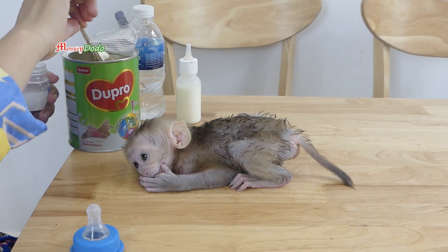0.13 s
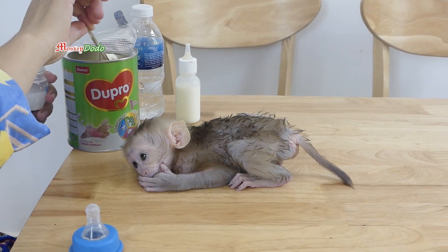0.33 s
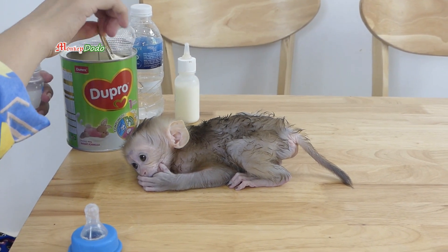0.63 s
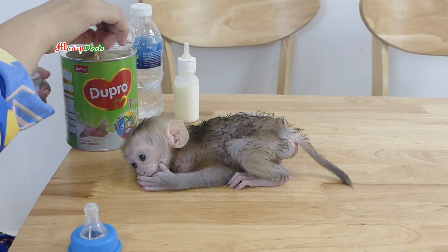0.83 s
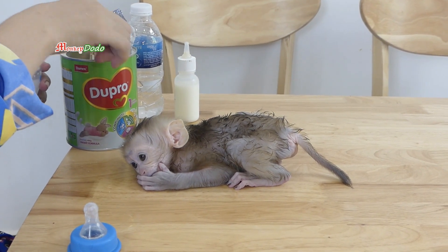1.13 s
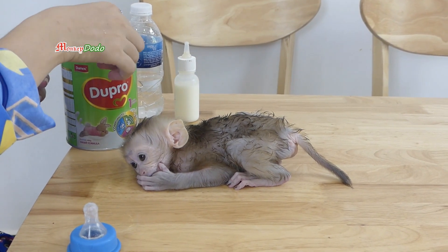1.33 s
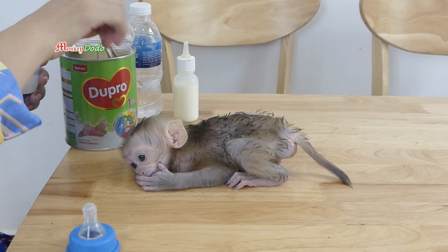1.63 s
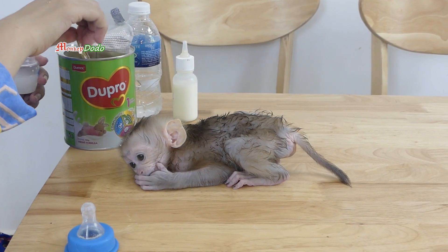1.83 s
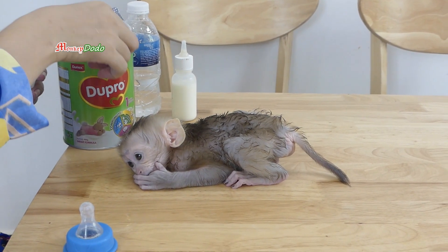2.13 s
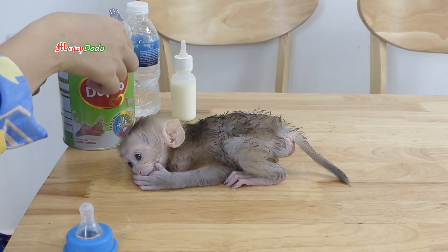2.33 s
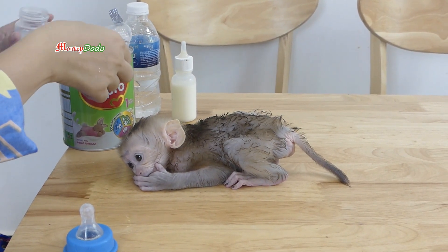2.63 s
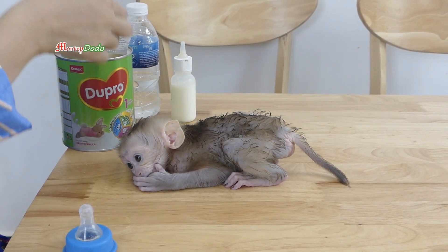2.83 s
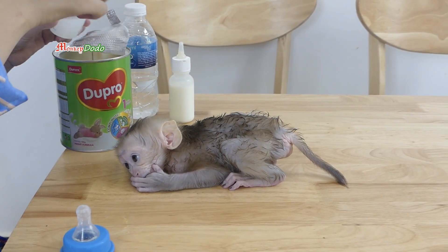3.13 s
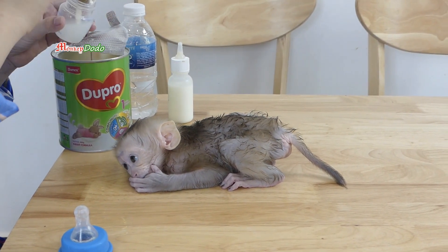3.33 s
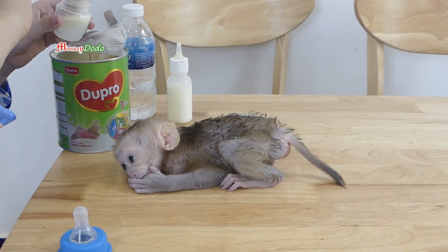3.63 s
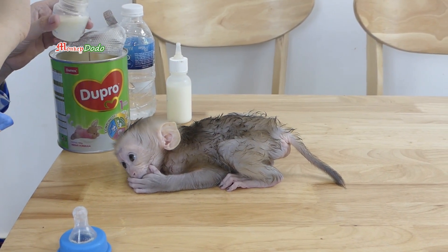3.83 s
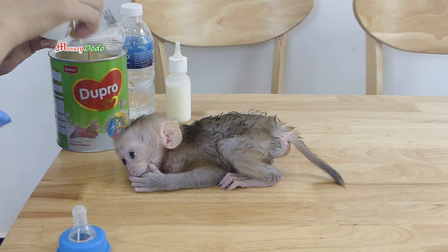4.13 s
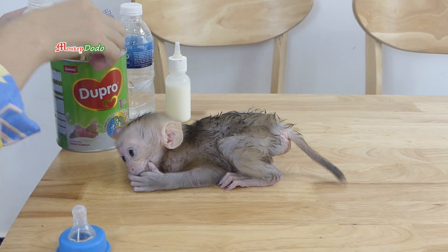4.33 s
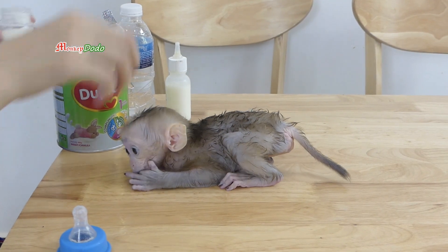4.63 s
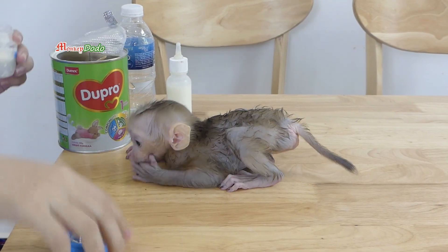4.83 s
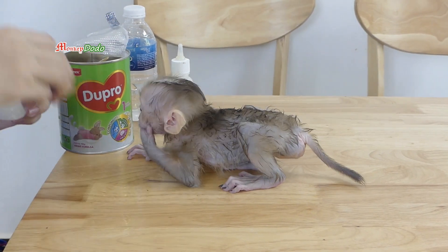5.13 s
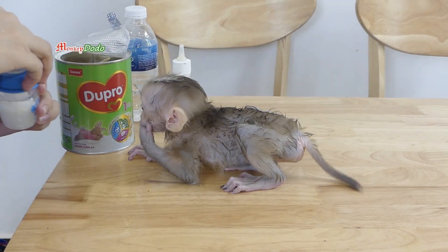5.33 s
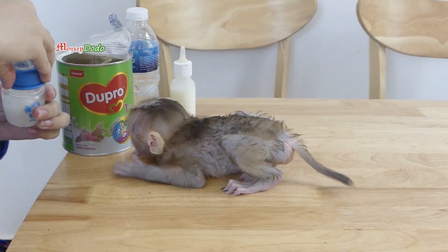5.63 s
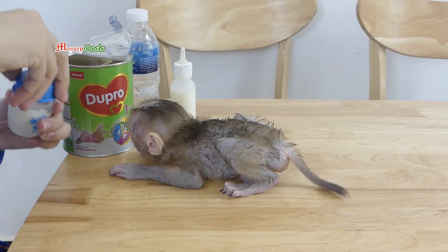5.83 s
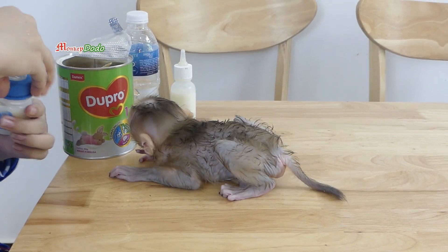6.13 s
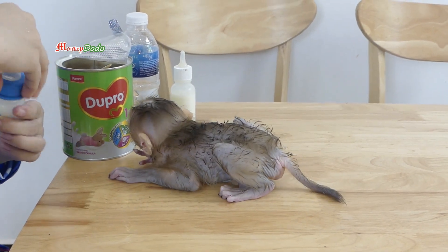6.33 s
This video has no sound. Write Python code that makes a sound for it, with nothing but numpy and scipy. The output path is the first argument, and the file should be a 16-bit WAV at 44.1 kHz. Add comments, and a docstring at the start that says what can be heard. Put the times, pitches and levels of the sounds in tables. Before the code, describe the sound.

In a bare ringing room, a scoop taps a powder tin, a small monkey coos twice and screams, and a bottle cap snaps shut.

```python
"""Mains hum and room air lie beneath everything; a scoop taps and scrapes in a milk-powder tin.
A baby monkey on a wooden table cries three times in a bare, ringing room: two coos and a torn scream.
Foil crackles, a plastic bottle cap clicks and snaps shut, and the table thuds. Struck bodies are sums of
decaying modes, contacts are noise bursts, the voice is a stack of overtones coloured by the throat,
and the echoes are noise that decays band by band."""
import sys
import numpy as np
from scipy import signal
from scipy.fft import rfft, irfft, next_fast_len
from scipy.io import wavfile
from scipy.ndimage import uniform_filter1d

SR = 44100
rng = np.random.default_rng(int(sys.argv[2]) if len(sys.argv) > 2 else 0)


def int16_out(signal):
    """Quantize to a 16-bit WAV file."""
    q = np.round(np.clip(np.atleast_2d(signal).T, -1, 1) * 32767)
    wavfile.write(sys.argv[1], SR, q.astype(np.int16))


N = 285327
T = np.arange(N) / SR

# Spectrum of the room air. Each row: frequency in Hz, relative level in dB.
AIR_SPECTRUM = [(15, -64.5), (25, -25), (59, -12), (166, -7), (301, -6), (405, -11.5), (489, -2.5),
                (677, -14), (911, -12.5), (1560, -24), (5880, -25.5), (14800, -28), (16000, -44)]
# Stereo spread of the air. Each row: frequency in Hz, side minus mid in dB.
AIR_SIDE_SPECTRUM = [(60, -2), (110, 8), (200, 6.5), (380, 3), (700, 1.5), (1290, 4.5), (2380, 1),
                     (4400, -5), (8120, -6.5), (15000, -3)]
# Overtones of the machine. Each row: multiple of the mains frequency, mean level in dB.
HUM_OVERTONES = [(2, -77), (3, -68), (4, -72), (5, -69), (6, -74)]
AIR_DB, MAINS_HZ = -63.5, 60.1  # overall level of the air's mid signal; mains frequency

# Reverberation. Each row: frequency in Hz, t60 in s, side minus mid in dB.
ROOM_DECAY = [(150, 0.73, -6), (500, 0.86, -7.5), (1170, 0.79, -5.5), (3040, 0.9, -10), (7900, 0.82, -26.5),
              (14100, 0.61, 4.5)]
WET_DB, FIRST_WALL_S = 1.5, 0.0066
# The mouth beams its treble forward. Each row: frequency in Hz, level sent to the walls in dB.
VOICE_TO_WALLS = [(1000, -1.5), (4000, -5), (10000, -5)]
THUD_TO_WALLS_DB, TICK_TO_WALLS_DB = -4.5, -6.5

# Thuds on the table. Each row: start in s, peak in dB, frequency in Hz favoured by where the top is struck.
TABLE_THUDS = [(4.859, -45.5, 120), (4.921, -49, 198), (5.301, -46, 487), (5.631, -47, 407),
               (5.774, -35, 241.5), (5.91, -42.5, 262)]
# Modes of the table top. Each row: frequency in Hz, level in dB before the striking place weights it, t60 in s.
TABLE_MODES = [(114.2, -7.5, 1.4), (187.4, -23, 0.045), (239.7, 9.5, 0.14), (337, 9.5, 0.074),
               (422.4, 13.5, 0.11), (589, 9, 0.094)]
# Bright ticks: foil and thread, and at 0.171 s a grain of powder under the scoop. Each row: start in s, peak in
# dB, band centre in Hz.
BRIGHT_TICKS = [(0.171, -49.5, 9500), (1.455, -47.5, 10200), (2.469, -49, 7300), (3.071, -55, 4140),
                (4.962, -32, 3920), (5.309, -38.5, 8150), (6.088, -45, 11300), (6.095, -61, 12700),
                (6.107, -53, 9600), (6.315, -57, 12000)]

# Scoop against the tin. Each row: start in s, peak of the ring in dB, clatter relative to the ring in dB,
# clatter centre in Hz, fizz relative to the clatter in dB.
SCOOP_TAPS = [(.158, -60.5, 8.5, 4500, 2), (.216, -64, 6, 3580, 6), (.478, -42, -8, 2700, 1),
              (.53, -50, -12, 2720, -4), (.555, -61, -12, 2000, -10), (1.443, -50, 3.5, 1630, -2),
              (1.573, -50.5, -1.5, 4900, -2.5), (3.758, -43, -9, 3460, 2.5), (4.215, -39.5, -4, 2900, -2),
              (4.478, -47.5, 8, 2960, -11), (5.3, -35.5, -0.5, 3460, -10)]
# Modes of the tin, damped by the powder. Each row: frequency in Hz, level in dB, t60 in s.
TIN_MODES = [(810, 0, .08), (1070, -2, .08), (1450, -1, .09), (1540, -3, .08), (1300, -7, .06),
             (1750, -6, .06), (1930, -4, .08), (2060, -5, .08), (2450, -5, .06), (2720, -3, .06),
             (3150, -6, .06), (3600, -10, .05), (4720, -11, .04), (5600, -13, .03)]
# Strokes of the scoop. Each row: loudest moment in s, level in dB, rise in dB per s, fall in dB per s.
SCOOP_STROKES = [(0.257, -51.5, 510, 1800), (0.375, -57.5, 1360, 152)]
GRIT_DB = -11.5  # hiss of the powder relative to the ringing tin
# Plastic cap on the bottle. Each row: start in s, peak of the ring in dB, clatter relative to the ring in dB,
# clatter centre in Hz, fizz relative to the clatter in dB.
CAP_SNAPS = [(5.57, -63, 4, 4210, -20), (5.6205, -12.5, -9, 3140, -12.5), (6.2165, -54, 10.5, 720, -17),
             (6.246, -46.5, -1.5, 4100, -11)]
# Modes of the cap. Each row: frequency in Hz, level in dB, t60 in s.
CAP_MODES = [(330, -28, .05), (600, -28, .05), (950, -26, .04), (1180, -20, .04), (2300, -13, .015),
             (2740, -4, .022), (2920, -4, .02), (3020, 0, .024), (3300, -6, .018), (3740, -12, .015),
             (6000, -18, .01), (7000, -18, .01)]

# Each coo is two pushes of breath. Each row: start, first crest, slack, second crest, fading and end in s,
# level in dB, brightness in dB per overtone octave, pitch in Hz, quavers per s, quaver slowing per s squared,
# moment of settling in s, settled pitch in Hz.
COO_CALLS = [(3.332, 3.503, 3.535, 3.57, 3.68, 3.663, -30.5, -0.43, 1013, 14.5, 15.88, 3.592, 952.4),
             (4.121, 4.171, 4.21, 4.295, 4.325, 4.35, -30.5, 2, 995.9, 12.37, 0.079, 4.35, 990)]
# Effort of a coo at start, first crest, slack, second crest, fading and end.
# Each row: level in dB, brightness in dB per overtone octave, both added to the call's own.
COO_EFFORT = [(-8, -4), (-0.5, 2.5), (-12.5, 5.5), (-0.7, 2.5), (-6.5, 2.5), (-14.5, -10.5)]
QUAVER_SHARE, QUAVER_GROWS_S, SETTLE_S = 0.0213, .07, 0.0282
# The scream rises, breaks and falls. Each row: time in s, pitch in Hz, level in dB.
SCREAM_COURSE = [(4.933, 1351, -35), (4.959, 1432, -31.5), (4.98, 1338, -24), (5.04, 1338, -29.5),
                 (5.046, 1220, -30), (5.129, 1065, -31), (5.161, 1140, -41), (5.198, 1100, -35.5),
                 (5.222, 951, -31), (5.24, 734, -36)]
TEAR_S, MEND_FROM_S, MENDED_S = 5.043, 5.11, 5.165  # the folds tear at once and mend slowly
THREE_TO_FOUR_S = 5.088  # the uneven pattern first repeats every three cycles, then every four
TORN_UNEVEN, MENDED_UNEVEN = .75, 0.12
TORN_BREATH, CLEAR_BREATH = 2.1, 0.18
# brightness terms in dB per overtone octave, and the time the mouth takes to close
CLEAR_BRIGHT_DB, MENDED_BRIGHT_DB, CLOSING_DB, CLOSING_S = 0.65, 3, -41, .018
# Throat and mouth nearly shut. Each row: frequency in Hz, level in dB.
SHUT_THROAT = [(300, -20), (1000, 2), (2000, -19), (3000, -31.5), (4000, -18), (5000, -36.5), (6500, -45),
               (8500, -36.5), (11000, -52), (14000, -69)]
# Throat and mouth wide open. Each row: frequency in Hz, level in dB.
OPEN_THROAT = [(300, -23), (700, -8.5), (1050, -3), (1600, 0.5), (1900, -25.5), (2300, -16.5), (2900, -16),
               (3500, -10.5), (3950, -21.5), (4600, -15.5), (5000, -39), (5700, -28), (7000, -37),
               (10500, -39.5), (13000, -81)]

BASS_CUT_HZ, TOP_HZ = 114, 15700


def undb(db):
    """A level in decibels is the logarithm of an amplitude ratio; this inverts it."""
    return 10 ** (np.asarray(db) / 20)


def unit(x):
    """Normalization divides a signal by its root mean square."""
    return x / np.sqrt(np.mean(x ** 2))


def on_log(hz, table, column=1):
    """Interpolation on a log-frequency axis reads a spectrum table by musical interval."""
    table = np.array(table)
    return np.interp(np.log(np.maximum(hz, 1)), np.log(table[:, 0]), table[:, int(column)])


def colour(x, table):
    """Linear filtering multiplies the spectrum by a gain given as (Hz, dB) points."""
    size = next_fast_len(len(x))
    gain = undb(on_log(np.fft.rfftfreq(size, 1 / SR), table))
    return irfft(rfft(x, size) * gain, size)[:len(x)]


def band(x, lo_hz, hi_hz):
    """A band-pass filter keeps the energy between two cutoff frequencies."""
    edges = [lo_hz, min(hi_hz, .45 * SR)]
    return signal.sosfilt(signal.butter(2, edges, "band", fs=SR, output="sos"), x)


def walk(rate):
    """Smoothed random steps, `rate` per second, give a slow drift of rms 1."""
    k = int(SR / rate)
    steps = np.repeat(rng.standard_normal(N // k + 1), k)
    return unit(uniform_filter1d(uniform_filter1d(steps, k), k)[:N])


def ring(modes, spread_db):
    """Modal superposition: a blow excites decaying sines, each with a random share; peak 1."""
    t = T[:SR]
    shares = undb(spread_db * rng.standard_normal(len(modes)))
    y = 0
    for share, (hz, db, t60) in zip(shares, modes):
        y = y + share * undb(db) * np.sin(2 * np.pi * hz * t) * 1000. ** (-t / t60)
    y = y * np.minimum(t / 0.0014, 1)  # contact takes about a millisecond to build
    return y / np.abs(y).max()


def crack(lo_hz, hi_hz, t60):
    """Irregular contact radiates a short, decaying burst of band-limited noise; peak 1."""
    t = T[:SR // 10]
    noise = band(band(rng.standard_normal(len(t)), lo_hz, hi_hz), lo_hz, hi_hz)
    y = noise * 1000. ** (-t / t60) * np.minimum(t / 0.0029, 1)
    return y / np.abs(y).max()


def add(track, sound, s):
    """Superposition: pressures that overlap in time add."""
    i = int(s * SR)
    track[i:i + len(sound)] += sound[:N - i]


def air():
    """Broadband turbulence: shaped noise that swells a little, in mid and side."""
    mid, side = (colour(rng.standard_normal(N), AIR_SPECTRUM) * undb(0.4 * walk(2.685)) for _ in range(2))
    scale = undb(AIR_DB) / np.sqrt(np.mean(mid ** 2))
    return scale * (mid + colour(side, AIR_SIDE_SPECTRUM) * np.array([[1], [-1]]))


def hum():
    """Periodic excitation at the mains rate yields harmonics, here wavering in level and phase."""
    out = np.zeros((2, N))
    for k, db in HUM_OVERTONES:
        # each microphone port meets the standing waves at its own phase
        port_phase = 0.32 * rng.random((2, 1))
        phase = 2 * np.pi * (round(k) * MAINS_HZ * T + port_phase) + 0.34 * walk(6)
        out += np.sqrt(2) * undb(db + 2.0 * walk(10)) * np.cos(phase)
    return out


def room(x):
    """Diffuse reverberation: echoes die away exponentially by band, mostly alike left and right."""
    t, tail = T[:int(1.5 * SR)], 0
    for hz in 88 * 2 ** np.arange(8.):  # octave bands
        mid, side = (band(rng.standard_normal(len(t)), hz / np.sqrt(2), hz * np.sqrt(2)) for _ in range(2))
        pair = mid + undb(on_log(hz, ROOM_DECAY, column=2)) * side * np.array([[1], [-1]])
        tail = tail + pair * 1000. ** (-t / on_log(hz, ROOM_DECAY))
    tail = tail * (t > FIRST_WALL_S)
    tail = tail / np.sqrt(np.sum(tail ** 2) / 2)  # unit energy per channel on average
    return undb(WET_DB) * signal.fftconvolve(x[None], tail, axes=1)[:, :N]


def thuds():
    """Modal coupling: a soft push rings the table top; modes far from the favoured pitch speak less."""
    out = np.zeros(N)
    for s, db, top_hz in TABLE_THUDS:
        modes = [(hz, d - 14.7 * np.log2(hz / top_hz) ** 2, t60) for hz, d, t60 in TABLE_MODES]
        y = np.convolve(ring(modes, 1), np.hanning(int(0.0026 * SR)))  # softens the blow
        y = y * np.minimum(T[:len(y)] / 0.0068, 1)
        add(out, undb(db) * y / np.abs(y).max(), s)
    return out


def ticks():
    """Impulsive radiation: foil, thread and a grain of powder give tiny bright clicks, each in its own band."""
    out = np.zeros(N)
    for s, db, hz in BRIGHT_TICKS:
        add(out, undb(db) * crack(0.64 * hz, 1.39 * hz, 0.023), s)
    return out


def knocks(events, modes, t60):
    """Impact: a blow rings the body's modes while its contact gives a broad clatter and a bright fizz."""
    out = np.zeros(N)
    for s, db, clatter_db, hz, fizz_db in events:
        add(out, undb(db) * ring(modes, 0.47), s)
        clatter = crack(0.51 * hz, 1.66 * hz, t60)
        fizz = undb(fizz_db) * crack(4500, 14000, t60)
        add(out, undb(db + clatter_db) * (clatter + fizz), s)
    return out


def taps():
    """Impact of the scoop on the tin, whose modes the powder damps."""
    return knocks(SCOOP_TAPS, TIN_MODES, 0.069)


def snaps():
    """Impact of the plastic cap on the bottle, a small body with short modes."""
    return knocks(CAP_SNAPS, CAP_MODES, 0.081)


def scrape():
    """Friction: dense uneven slips of the scoop excite the tin and hiss through the powder."""
    slips = rng.standard_normal(N) * undb(2.4 * walk(61.0))
    body = unit(signal.fftconvolve(slips, ring(TIN_MODES, 0.76))[:N])
    grit = unit(band(slips, 4600, 11400)) * undb(GRIT_DB)
    pressure = 0
    for s, db, rise, fall in SCOOP_STROKES:
        pressure = pressure + undb(db + np.minimum(rise * (T - s), fall * (s - T)))
    return (body + grit) * pressure


def cry(start, end, hz, db, bright, uneven, breath, throat):
    """Source and filter: folds give overtones, uneven cycles add lines between, the throat colours all."""
    t = start + T[:SR // 2]
    gate = np.clip(np.minimum((t - start) / 0.0032, (end - t) / 0.003), 0, 1)
    # torn folds lose their timing
    jitter = 0.0035 * walk(80.2)[:len(t)] + 0.042 * uneven * walk(500)[:len(t)]
    cycles = np.cumsum(hz * (1 + jitter)) / SR
    pattern = 2 * np.pi * cycles / np.where(t < THREE_TO_FOUR_S, 3, 4)
    phase = 2 * np.pi * cycles + 0.72 * uneven * np.sin(pattern)
    mouth = walk(20)  # small mouth movements swell each overtone at its own moment
    stack = 0
    for k in range(1, 12):
        swell_db = 1.27 * (k > 1) * np.roll(mouth, 3000 * k)[:len(t)]
        stack = stack + undb(bright * np.log2(k) + swell_db) * np.cos(k * phase)
    folds = stack * (1 + uneven * np.cos(pattern)) + 0.91 * uneven * np.cos(pattern)
    puff = breath * band(rng.standard_normal(len(t)), 2300, 12000)
    voice = np.sqrt(2) * (folds + puff) * undb(db) * gate
    out = np.zeros(N)
    add(out, colour(voice, throat), start)
    return out


def coo(*row):
    """Frequency modulation through a nearly shut mouth: the pitch quavers, slowing and settling lower
    in the first coo, almost steady in rate in the second."""
    *stages, db, bright_db, hz, rate, slowing, settles, settled_hz = row
    age = T[:SR // 2]
    t = stages[0] + age
    depth = QUAVER_SHARE * np.minimum(age / QUAVER_GROWS_S, 1)
    quaver = hz * (1 - depth * np.cos(2 * np.pi * (rate - slowing * age) * age))
    settled = np.clip(1 + (t - settles) / SETTLE_S, 0, 1)
    pitch = quaver + (settled_hz - quaver) * settled
    effort, bright = (np.interp(t, stages, column) for column in np.transpose(COO_EFFORT))
    return cry(stages[0], stages[-1], pitch, db + effort, bright_db + bright, 0, 0, SHUT_THROAT)


def scream():
    """Subharmonic phonation: clear at first, then torn and breathy, then a bright fall as the mouth closes."""
    s, hz, db = np.transpose(SCREAM_COURSE)
    t = s[0] + T[:SR // 2]
    mended = np.clip((t - MEND_FROM_S) / (MENDED_S - MEND_FROM_S), 0, 1)
    torn = (t > TEAR_S) * (1 - mended)
    closing = np.clip(1 + (t - s[-1]) / CLOSING_S, 0, 1)
    bright = CLEAR_BRIGHT_DB + MENDED_BRIGHT_DB * mended + CLOSING_DB * closing
    uneven = TORN_UNEVEN * torn + MENDED_UNEVEN * mended
    breath = CLEAR_BREATH + TORN_BREATH * torn
    return cry(s[0], s[-1], np.interp(t, s, hz), np.interp(t, s, db), bright, uneven, breath, OPEN_THROAT)


def scene():
    """Direct and reverberant fields add: near sounds lean left, the room answers, the air lies beneath."""
    monkey = sum(coo(*row) for row in COO_CALLS) + scream()
    hands = taps() + scrape() + snaps()
    table = thuds()
    clicks = ticks()
    left = np.array([[.5], [-.5]])  # times the left-right difference in dB
    near = monkey * undb(2.5 * left) + (hands + table + clicks) * undb(0.79 * left)
    # thuds and ticks feed the walls less
    far = colour(monkey, VOICE_TO_WALLS) + hands
    far = far + undb(THUD_TO_WALLS_DB) * table + undb(TICK_TO_WALLS_DB) * clicks
    return near + room(far) + air() + hum()


def record(dry):
    """Band limitation: a high-pass thins the bass and a steep low-pass cuts the top."""
    thin = signal.sosfilt(signal.butter(2, BASS_CUT_HZ, "high", fs=SR, output="sos"), dry)
    return signal.sosfilt(signal.ellip(10, .2, 80, TOP_HZ, fs=SR, output="sos"), thin)


dry = scene()
out = record(dry)
int16_out(out)
```